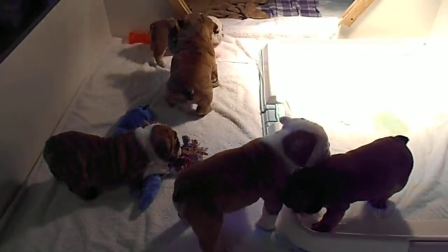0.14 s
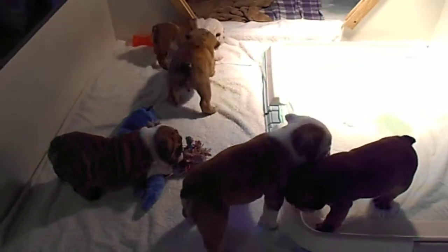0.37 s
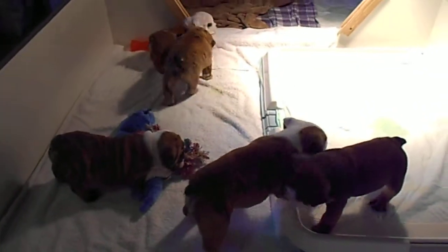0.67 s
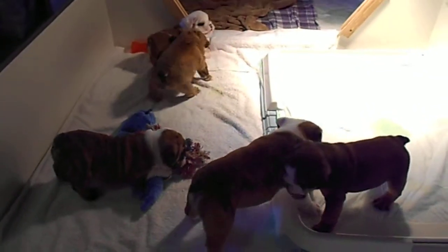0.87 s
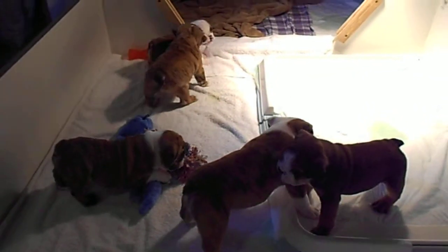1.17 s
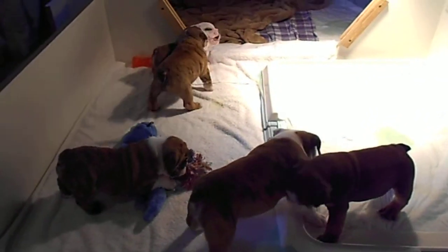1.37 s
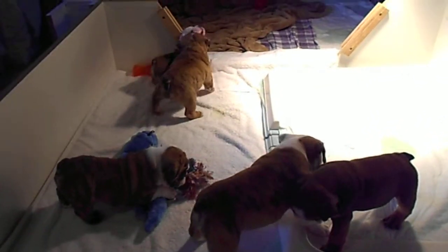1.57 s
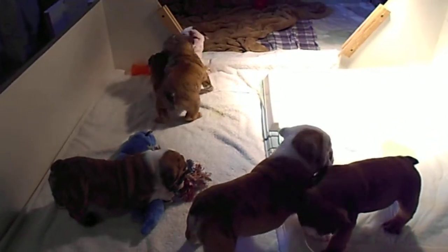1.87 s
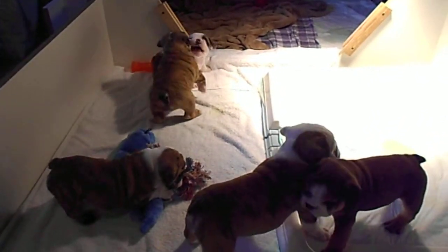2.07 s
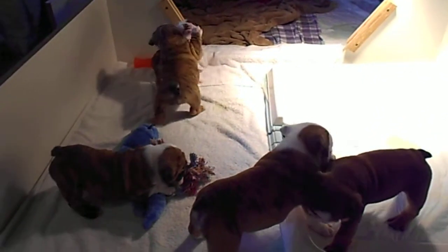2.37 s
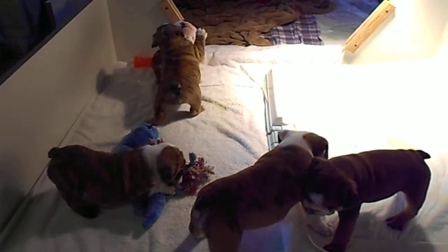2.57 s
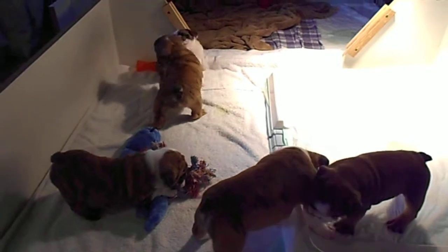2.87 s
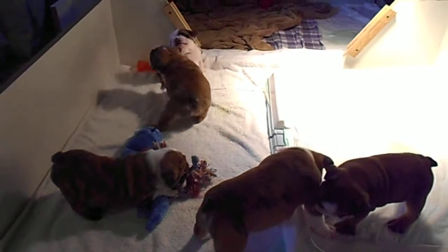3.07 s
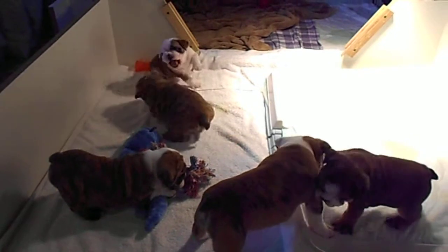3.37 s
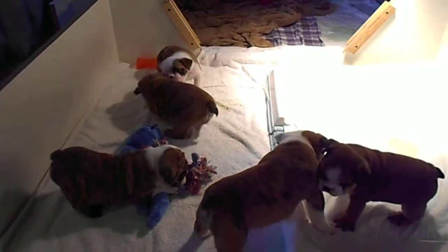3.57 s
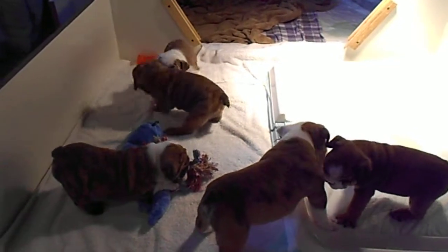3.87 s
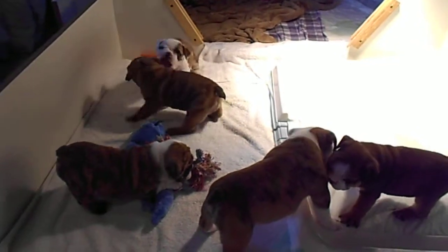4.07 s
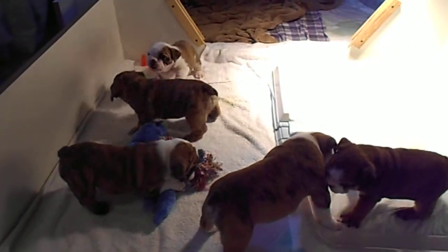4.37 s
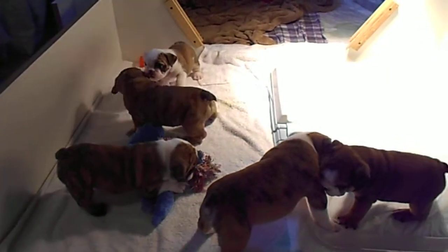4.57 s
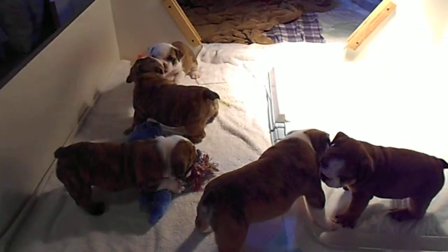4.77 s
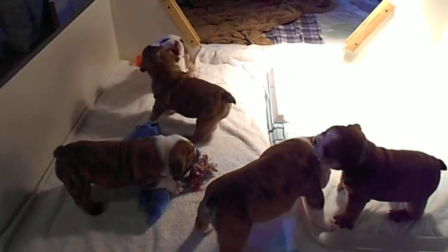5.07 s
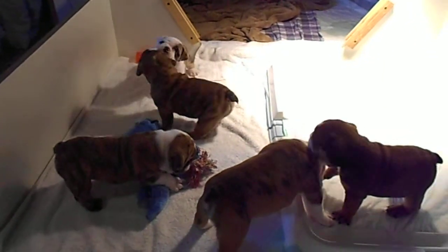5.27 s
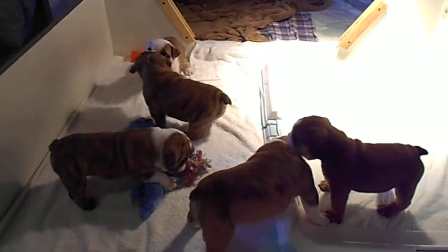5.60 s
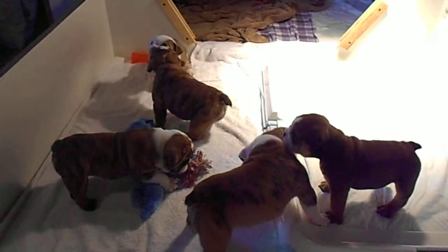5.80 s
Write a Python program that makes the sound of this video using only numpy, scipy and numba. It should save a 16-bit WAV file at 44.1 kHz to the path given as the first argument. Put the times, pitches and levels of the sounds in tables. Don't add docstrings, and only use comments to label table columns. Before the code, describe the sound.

Bulldog puppies wrestle in a small padded indoor pen, growling in rough throbbing bursts amid rustling bedding, paw thumps and sharp little clicks.

```python
import sys
import numpy as np
from scipy import signal
from scipy.fft import rfft, irfft, next_fast_len
from scipy.io import wavfile
from scipy.ndimage import uniform_filter1d
from numba import njit

SR = 44100
rng = np.random.default_rng(int(sys.argv[2]) if len(sys.argv) > 2 else 0)


def unload_audio(sound):
    columns = np.transpose(np.atleast_2d(sound))
    steps = np.round(np.clip(columns, -1, 1) * 32767)
    wavfile.write(sys.argv[1], SR, steps.astype(np.int16))


def gain_from_db(level_db):
    decades = np.asarray(level_db, float) / 20
    return 10 ** decades


N = 261954


def rms_one(x):
    return x / np.sqrt(np.mean(x ** 2) + 1e-20)


def in_time(rows):
    s, *columns = np.transpose(rows)
    return [np.interp(np.arange(N) / SR, s, c) for c in columns]


def drift(rate_hz):
    r = np.exp(-2 * np.pi * rate_hz / SR)
    noise = rng.standard_normal(N + SR)
    return rms_one(signal.lfilter([1], [1, -2 * r, r * r], noise)[SR:])


def steep(x, hz, kind, order=4):
    return signal.sosfilt(signal.butter(order, hz, kind, fs=SR, output="sos"), x)


def resonances(x, modes):
    out = 0
    for k, (hz, width_hz, db) in enumerate(modes):
        r = np.exp(-np.pi * width_hz / SR)
        b = np.array([1, 0, -1]) * (1 - r * r) / 2
        a = [1, -2 * r * np.cos(2 * np.pi * hz / SR), r * r]
        out = out + (-1) ** k * gain_from_db(db) * signal.lfilter(b, a, x)
    return out


@njit
def moving_resonance(x, turn, r):
    y = np.zeros(len(x))
    for i in range(2, len(x)):
        push = (1 - r * r) / 2 * (x[i] - x[i - 2])
        y[i] = push + 2 * r * np.cos(turn[i]) * y[i - 1] - r * r * y[i - 2]
    return y


def ring(x, hz, width_hz):
    return moving_resonance(x, 2 * np.pi * hz / SR, np.exp(-np.pi * width_hz / SR))


def evened(x, s):
    return x / np.sqrt(uniform_filter1d(x * x, int(s * SR)) + 1e-12)


def coloured(spectrum, lowest_hz, highest_hz, patchy_db, count):
    hz, db = np.transpose(spectrum)
    edges = np.geomspace(lowest_hz, highest_hz, count)
    white = rng.standard_normal((2, N))
    out = 0
    for k, (low, high) in enumerate(zip(edges, edges[1:])):
        level_db = np.interp(np.log(low * high) / 2, np.log(hz), db)
        band = steep(white[k % 2], [low, high], "band", order=2)
        out = out + gain_from_db(level_db + patchy_db * drift(6.4)) * band
    return rms_one(out)


def bumps(times, heights, rise_s, fall_s):
    out, lag = np.zeros(N + SR), np.arange(-SR // 20, SR // 8) / SR
    shape = np.exp(-(lag / np.where(lag < 0, rise_s, fall_s)) ** 2)
    for s, height in zip(times, heights):
        at = round(s * SR) - SR // 20
        out[at:at + len(lag)] = np.maximum(out[at:at + len(lag)], height * shape)
    return out[:N]


def puffs(times, levels_db, sag_db, sag_s, stop_db_per_s):
    t = np.arange(N) / SR
    last = np.searchsorted(times, t) - 1
    age = t - times[last]
    sag = sag_db * (1 - np.exp(-(age / sag_s) ** 2))
    db = levels_db[last] + sag + stop_db_per_s * np.maximum(age - .05, 0)
    return uniform_filter1d(gain_from_db(db) * (last >= 0), SR // 400)


# start_s, hiss_db (fur and snorted air), shuffle_db (weight of bodies)
STIR = [(0, -53, -48), (.21, -58.5, -51), (.5, -55.5, -50), (.84, -54.5, -47), (1.4, -53, -46.5),
        (1.75, -58.5, -63), (1.87, -58.5, -80), (2.15, -60, -51), (2.41, -57, -56), (2.7, -52, -52),
        (3.1, -50, -50), (3.42, -58.5, -52), (3.87, -65, -57), (4.45, -53.5, -59), (4.95, -66, -54),
        (5.3, -52.5, -57.5), (5.75, -55.5, -48.5), (5.94, -62, -52.5)]
# start_s, level_db
SNORTS = [
    (1.44, -58),
    (1.54, -42),
    (2.02, -39),
    (2.96, -39),
    (3.121, -36),
    (5.76, -56),
]
# pitch_hz, level_db (per Hz)
HISS = [
    (3410, -62),
    (5800, -17),
    (6130, -11.5),
    (7790, -9),
    (9180, -5.5),
    (9750, -1),
    (10600, -10.5),
    (13800, -59),
    (22000, -120),
]


def rustle(throb, nose):
    hiss_db, shuffle_db = in_time(STIR)
    s, snort_db = np.transpose(SNORTS)
    grain = gain_from_db(1.56 * drift(300) + 0.27 * drift(30)) * (1.6 + throb)
    hiss = evened(grain * coloured(HISS, 5500, 11380, patchy_db=1.8, count=9), 0.4)
    hiss_level = gain_from_db(hiss_db - 0.1) + nose + bumps(s, gain_from_db(snort_db - 8), 0.037, 0.0083)
    shuffle = rms_one(steep(rng.standard_normal(N), [60, 210], "band", order=2))
    return hiss_level * hiss + gain_from_db(shuffle_db + 1.0 + 3.8 * drift(5.5)) * shuffle


# pitch_hz, level_db (per Hz)
HOUSE = [
    (30, -8),
    (60, -16),
    (100, -11),
    (200, -1),
    (330, -2.5),
    (800, -6.5),
    (1500, -15),
    (3400, -23.5),
    (5500, -26.5),
]
HOUSE_DB, HUM_HZ, HUM_DB = -46, 58.8, -65
STIR_REST_DB, HOUSE_FOLLOWS = -58, 0.71


def house():
    hum = np.sqrt(2) * np.sin(2 * np.pi * np.cumsum(HUM_HZ + 1.2 * drift(2.6)) / SR)
    rumble = coloured(HOUSE, 27.75, 5950, patchy_db=2.0, count=20)
    stir_db = np.clip(HOUSE_FOLLOWS * (in_time(STIR)[0] - STIR_REST_DB), -6, 8)
    return gain_from_db(HOUSE_DB + stir_db) * rumble + gain_from_db(HUM_DB + 5.0 + 1.7 * drift(4)) * hum


# start_s, peak_db, body_db (the duller knock)
TICKS = [(.352, -41, 3), (.505, -46, 14.5), (.535, -34.5, 7.5), (.555, -39, -9), (1.365, -34, 0),
         (1.76, -35, 18), (2.416, -53, 18), (5.882, -45.5, 20), (3.272, -39, 17), (0.391, -38, 9),
         (0.608, -33.5, 11), (1.093, -35, -26), (1.244, -29, 0), (1.4298, -20.5, -21), (1.5188, -36, -6),
         (1.734, -26.5, -4), (2.129, -61, 0), (2.208, -44, -16), (2.21, -33, 7), (2.303, -41, -2),
         (3.1034, -52, -17), (4.1693, -26, -27), (4.9088, -38, -24), (5.6267, -59, 6), (5.914, -34, 1)]


def ticks():
    out, t = np.zeros(N + SR), np.arange(600) / SR
    for (s, db, body_db), noise in zip(TICKS, rng.standard_normal((len(TICKS), 2, 600))):
        burst = noise * np.exp(-(t / .0016) ** 2)
        bright = steep(burst[0], [6500, 11000], "band", order=2)
        knock = steep(burst[1], [1800, 4500], "band", order=2)
        tick = bright / np.abs(bright).max() + gain_from_db(body_db - 9) * knock / np.abs(knock).max()
        out[round(s * SR):round(s * SR) + 600] += gain_from_db(db + 1.5) * tick
    return out[:N]


# start_s, peak_db, pitch_hz
THUMPS = [
    (0.367, -32, 169),
    (0.421, -19.5, 190),
    (0.79, -19, 140),
    (0.837, -28, 128),
    (.94, -34, 150),
    (2.21, -48, 110),
    (3.268, -28, 144),
    (3.573, -33, 160),
    (3.669, -43, 177),
    (4.561, -43, 89.6),
]


def thumps():
    out, t = np.zeros(N + SR), np.arange(SR // 10) / SR
    for s, db, hz in THUMPS:
        envelope = (t / 0.0015) * np.exp(1 - t / 0.0036)
        swing = envelope * np.sin(2 * np.pi * hz * t * (1.1 - 9 * t))
        out[round(s * SR):round(s * SR) + len(t)] += gain_from_db(db - 6.0) * swing
    return out[:N]


# start_s, effort_db (throat), pitch_hz, mouth_db (opening), chest_db (chest over throat)
GRUMBLE = [(.59, -34, 225.1, -18, 1), (.628, -27.5, 240.5, -12.5, 1), (.705, -28, 234.6, -17, 7.5),
           (.739, -24, 255.6, -14, -3), (.804, -33, 236.3, -15, 11.5)]
MUTTER = [(0.952, -37.5, 276.9, -17, 4), (.995, -35.5, 260.5, -19.5, -3.5), (1.067, -35, 305.1, -17.5, 3.5),
          (1.14, -30.5, 260.1, -21.5, -4), (1.177, -31.5, 286.2, -16, 6.5), (1.223, -34, 284.2, -26, 10.5),
          (1.258, -30, 262.8, -17.5, 8), (1.374, -34.5, 311.2, -19.5, 11), (1.463, -32, 283.5, -23, 5.5)]
SNARL = [(1.5, -38, 315.1, -6.5, 12), (1.535, -30, 272.1, 0, 6.5), (1.621, -29, 276.2, -4.5, 4),
         (1.693, -28, 296.7, -5.5, 2), (1.808, -34.5, 299.8, -8.5, 6), (1.924, -29, 313.7, -10.5, -3),
         (2.045, -31, 319.1, -13, 4.5), (2.127, -51.5, 281.9, -6, 10.5), (2.192, -58, 267.7, 8.5, 15)]
LONG_GROWL = [(2.422, -35, 286, -19, 4.5), (2.456, -27, 273, -11.5, 1), (2.623, -28.5, 305, -19, 1.5),
              (2.76, -27, 282, -22.5, 2.5), (2.797, -26, 276, -11.5, 5), (2.871, -22.5, 295, -15, 2),
              (3.062, -24, 284, -11, 3.5), (3.25, -29.5, 290, -18, 3), (3.314, -44.5, 275, -16, 8)]
SWELL = [(3.831, -43.5, 284.5, -17.5, 4), (3.915, -43, 277, -15, 10), (4.054, -38.5, 246.8, -23, 4.5),
         (4.091, -31.5, 272, -17, 6), (4.184, -28, 240.1, -17, -1.5), (4.286, -25, 262, -17, 2),
         (4.339, -28.5, 264.1, -15.5, 3.5), (4.382, -36, 281, -15, -4)]
LUNGE = [(4.851, -63, 215, -17, 24.5), (4.928, -40.5, 229.7, -21, 3.5), (5.061, -32.5, 215.2, -21, 4.5),
         (5.132, -32.5, 223.7, -15, -0.5), (5.164, -22.5, 263.6, -18, 0), (5.201, -23, 288.3, -12, 5),
         (5.312, -26, 279.2, -12, -1), (5.372, -32, 270, -14, 5)]
TUSSLE = [(5.441, -31, 272.7, -15.5, -5), (5.492, -27.5, 262.1, -16.5, 3.5),
          (5.585, -28.5, 271.6, -19.5, 2), (5.681, -27, 305.8, -19.5, 1.5), (5.745, -27.5, 259.2, -13, 4.5),
          (5.816, -31.5, 258.3, -20.5, 10), (5.885, -37, 277.8, -9, 8.5), (5.928, -26, 285.2, -8.5, -1)]
GROWLS = [GRUMBLE, MUTTER, SNARL, LONG_GROWL, SWELL, LUNGE, TUSSLE]
# throat_hz, mouth_hz, ring_db (how hard the mouth rings)
TRACTS = [(637, 1585, 2), (796, 2410, 2), (762, 2405, 1), (740, 2406, -2), (857, 2390, -8.5),
          (882, 2380, -0.5), (840, 2326, -2.5)]
FLUTTERS = [.05, .45, .28, .12, .18, .1, .05]
THROB_S, THROB_JITTER_S = .0385, 0.0046
LEAD_S, LEAD_JITTER_S = 0.0099, 0.012
CHEST_SPREAD_DB, THROAT_SPREAD_DB, MOUTH_SPREAD_DB, PITCH_SPREAD = -1, 0.9, 2, 0.05003
THROAT_HZ_PER_DB = 5.5


def throbs():
    out = []
    for growl, (throat_hz, mouth_hz, ring_db), flutter in zip(GROWLS, TRACTS, FLUTTERS):
        at, *columns = np.transpose(growl)
        beats = np.append(0, np.cumsum(np.maximum(np.round(np.diff(at) / THROB_S), 1)))
        beat = np.arange(beats[-1] + 1)
        chance = rng.standard_normal((40, 6))[:len(beat)].T.clip(-2, 2)
        chance = chance * ~np.isin(beat, beats)
        effort_db, hz, mouth_db, chest_db = (np.interp(beat, beats, c) for c in columns)
        s = np.interp(beat, beats, at) + THROB_JITTER_S * chance[0]
        out.append([s,
                    effort_db + chest_db + CHEST_SPREAD_DB * chance[1],
                    hz * (1 + PITCH_SPREAD * chance[2]),
                    s - LEAD_S - LEAD_JITTER_S * chance[3],
                    effort_db + THROAT_SPREAD_DB * chance[4],
                    mouth_db + MOUTH_SPREAD_DB * chance[5],
                    throat_hz + THROAT_HZ_PER_DB * (effort_db - effort_db.max()),
                    mouth_hz + 0 * s, ring_db + 0 * s, flutter + 0 * s])
    return np.hstack(out)


# pitch_hz, width_hz, level_db
CHEST = [
    (198.3, 8.4, 4.5),
    (315, 37.5, -0.5),
    (364.2, 11, -1),
]
CHEST_HELD_DB = -7


def chest_voice(s, chest_db, cycles, flutter, air):
    held = (1 - 2 * flutter) * bumps(s, gain_from_db(chest_db + CHEST_HELD_DB), .025, 0.02)
    beating = np.maximum(bumps(s, gain_from_db(chest_db + 2.0), 0.0033, 0.01), held)
    tone = beating * gain_from_db(1.5 * drift(60)) * np.sin(2 * np.pi * cycles)
    rumble = evened(steep(resonances(air, CHEST), [160, 430], "band", order=2), 0.2)
    return steep(tone + bumps(s, gain_from_db(chest_db - 10.5), 0.042, 0.065) * rumble, 64.0, "high")


# pitch_hz, width_hz, level_db
THROAT = [
    (453, 84, -1),
    (604, 18, 6.5),
    (878, 49, -12.5),
    (1226, 15, -1),
    (1400, 550, -34),
]


def throat_voice(source, throat_hz):
    moving = ring(source, throat_hz, 260)
    tilt = ring(resonances(source, THROAT), throat_hz, 700)
    return steep(tilt + gain_from_db(-2.5) * moving, [380, 1300], "band", order=3) + gain_from_db(-58.0) * tilt


# pitch_hz, width_hz, level_db
MOUTH = [
    (1840, 790, -3.5),
    (2025, 190, 2),
    (2627, 170, -7),
]
MOUTH_WANDER = .018


def mouth_voice(source, air, mouth_hz, focus_db):
    mouth_hz = mouth_hz * (1 + MOUTH_WANDER * drift(3.3))
    whistle = ring(rms_one(air), mouth_hz, 200)
    whistle = ring(whistle, mouth_hz, 380)
    return steep(resonances(source, MOUTH) + gain_from_db(focus_db) * whistle, [1400, 2950], "band", order=3)


# pitch_hz, width_hz, level_db
TEETH = [
    (3430, 2100, 0.5),
    (4400, 340, 0.5),
    (5170, 2000, -9.5),
]
TEETH_UNDER_THROAT_DB = 59
NOSE_DB, NOSE_FOLLOWS = -48.5, 1
NOSE_OPENS = 0.2


def growls():
    s, chest_db, hz, opens, throat_db, mouth_db, *tract = throbs()
    opens = np.maximum.accumulate(opens)
    throat_hz, mouth_hz, ring_db, flutter = in_time(np.transpose([s, *tract]))
    pitch_hz = np.interp(np.arange(N) / SR, s, hz) * (1 + .085 * drift(55))
    cycles = np.cumsum(pitch_hz) / SR
    closures = (np.diff(np.floor(cycles), prepend=0) > 0) * gain_from_db(6.2 * drift(95))
    air = rng.standard_normal(N) * (0.93 + np.cos(np.pi * cycles) ** 2)
    source = rms_one(closures) * .6 + rms_one(air) * .8

    chest = chest_voice(s, chest_db, cycles, flutter, air)
    throat = evened(throat_voice(source, throat_hz), 0.053)
    focus_db = ring_db + np.interp(np.arange(N) / SR, s, 5 + .3 * mouth_db)
    mouth = evened(mouth_voice(source, air, mouth_hz, focus_db), 0.022)
    throb = puffs(opens, np.zeros(len(s)), sag_db=-31.5, sag_s=0.02, stop_db_per_s=16.0)
    teeth = steep(resonances(air, TEETH), [3100, 5000], "band", order=2)
    teeth = evened((.6 + throb) * gain_from_db(1.5 * drift(25)) * teeth, 0.079)

    palate = 1 + flutter * (2 * bumps(s, np.ones(len(s)), .011, .013) - 1)
    throat_level = puffs(opens, throat_db - .5, sag_db=-2.0, sag_s=0.025, stop_db_per_s=-450)
    mouth_level = puffs(opens, throat_db + mouth_db + 0.5, sag_db=0.0, sag_s=0.0059, stop_db_per_s=-450)
    teeth_level = puffs(opens, throat_db - TEETH_UNDER_THROAT_DB, sag_db=-20.0, sag_s=.03,
                        stop_db_per_s=-450)
    voice = throat_level * palate * throat + mouth_level * palate ** 2 * mouth
    voice += (gain_from_db(snarls() + 4.5) + teeth_level) * teeth
    nose_db = NOSE_DB + NOSE_FOLLOWS * (throat_db - throat_db.max()) + NOSE_OPENS * (mouth_db + 12)
    nose = puffs(opens, nose_db, sag_db=-5.5, sag_s=0.02, stop_db_per_s=-200)
    return chest + voice, throb, nose


# start_s, length_s, pitch_hz, level_db
MOANS = [
    (.59, 0.069, 212.6, -26),
    (0.71, 0.13, 141.5, -31),
]
MOAN_HZ, MOAN_WIDTH_HZ, MOAN_EDGE_S = 630, 225, 0.024


def moans():
    t, out, waver = np.arange(N) / SR, 0, 1 + .012 * drift(20)
    for s, length_s, hz, db in MOANS:
        gate = np.clip(np.minimum(t - s, s + length_s - t) / MOAN_EDGE_S, 0, 1)
        turn = 2 * np.pi * hz * np.cumsum(waver) / SR
        for k in range(2, 8):
            strength = np.exp(-((k * hz - MOAN_HZ) / MOAN_WIDTH_HZ) ** 2)
            out = out + gain_from_db(db) * gate * strength * np.sin(k * turn + k * k)
    return out


# start_s, hold_s, level_db
SNARLS = [(0.723, 0.038, -54), (1.53, 0.028, -48), (1.653, 0.12, -43.5), (2.132, 0.058, -63),
          (2.495, 0.028, -57), (2.796, 0.09, -52), (3.265, 0.0054, -68), (4.175, .13, -64),
          (5.154, 0.19, -56), (5.74, 0.023, -65), (5.92, 0.031, -60)]
SNARL_RISE_DB_PER_S, SNARL_FALL_DB_PER_S = 1500, 157


def snarls():
    t, levels_db = np.arange(N) / SR, []
    for s, hold_s, db in SNARLS:
        rise_db = SNARL_RISE_DB_PER_S * np.maximum(s - t, 0)
        fall_db = SNARL_FALL_DB_PER_S * np.maximum(t - s - hold_s, 0)
        levels_db.append(db - rise_db - fall_db)
    return np.max(levels_db, axis=0)


PEN_T60_S, PEN_DB = .26, -7.5


def pen(x):
    t = np.arange(SR // 2) / SR
    dull, bright = rng.standard_normal((2, len(t))) * np.minimum(t / 0.0039, 1)
    tail = steep(dull, 1630, "low", order=2) * gain_from_db(-60 * t / PEN_T60_S)
    tail += steep(bright, 1400, "high", order=2) * gain_from_db(-60 * t / PEN_T60_S / 1.3)
    return signal.fftconvolve(x, tail / np.sqrt(SR * PEN_T60_S / np.log(1e6)))[:N]


def scene():
    voice, throb, nose = growls()
    near = voice + ticks() + thumps() + moans()
    return (near + gain_from_db(PEN_DB) * pen(near) + rustle(throb, nose) + house())[None]


def roll_off(x):
    return signal.sosfilt(signal.butter(12, 12620, fs=SR, output="sos"), x)


NOTCH_LAG = 4
NOTCH_WIDTH_HZ, IMAGE_DB, IMAGE_DB_PER_HZ = 290, 2.5, -.027


def record(dry):
    x = (dry[0] + np.roll(dry[0], NOTCH_LAG)) / 2
    size = 2 * next_fast_len(N // 2 + 1)
    above_hz = np.arange(size // 2 + 1) * SR / size - SR / 4
    stream = rfft(x, size) * np.clip(-above_hz / NOTCH_WIDTH_HZ, 0, 1)
    image = np.conj(stream[::-1]) * gain_from_db(IMAGE_DB + IMAGE_DB_PER_HZ * np.maximum(above_hz, 0))
    mix = irfft(stream - image, size)[None, :N]
    return roll_off(mix)


dry = scene()
out = record(dry)
unload_audio(out)
```